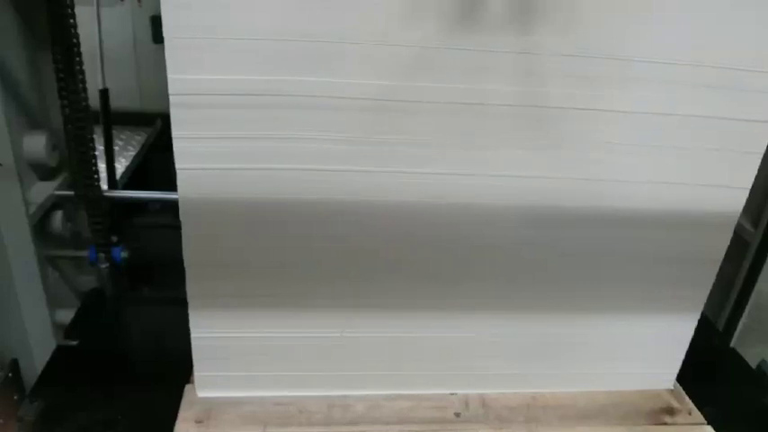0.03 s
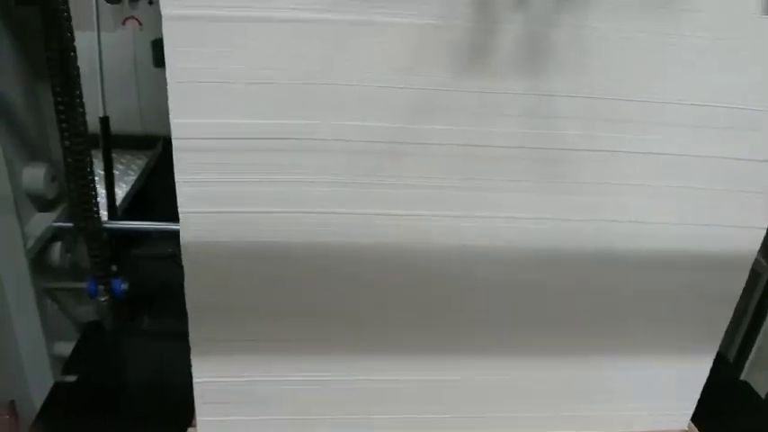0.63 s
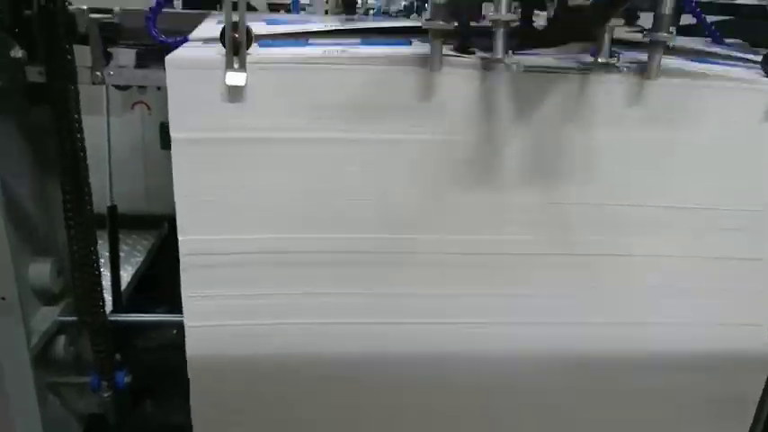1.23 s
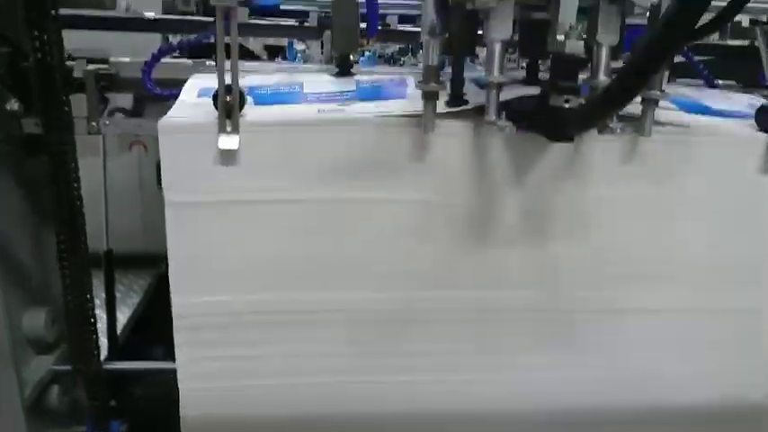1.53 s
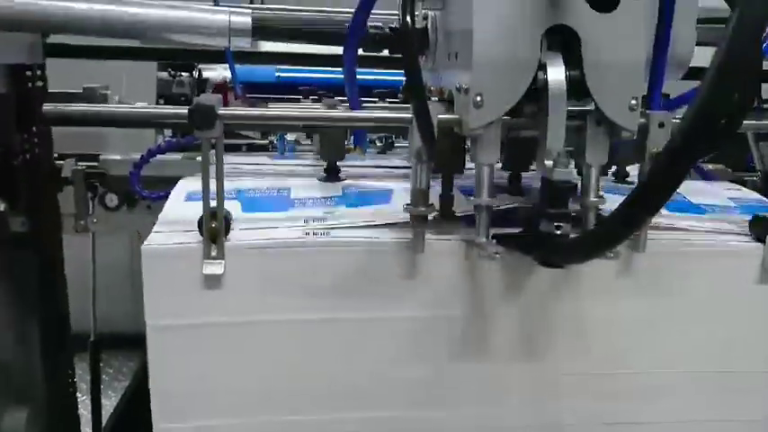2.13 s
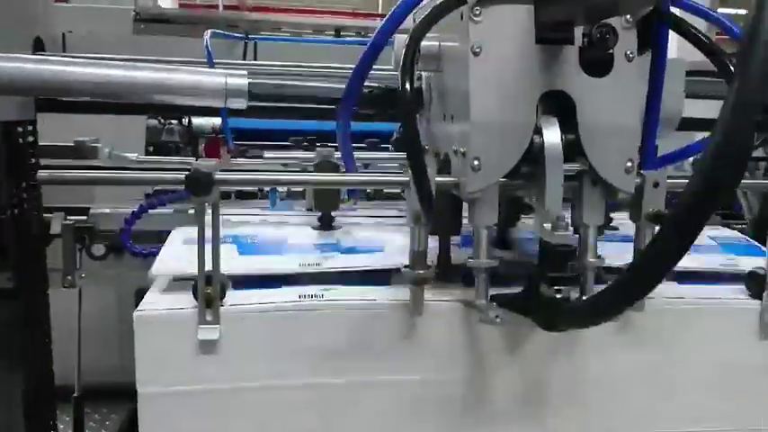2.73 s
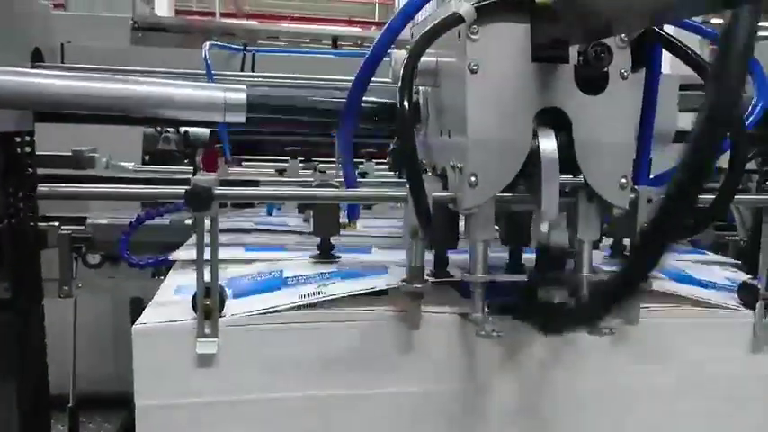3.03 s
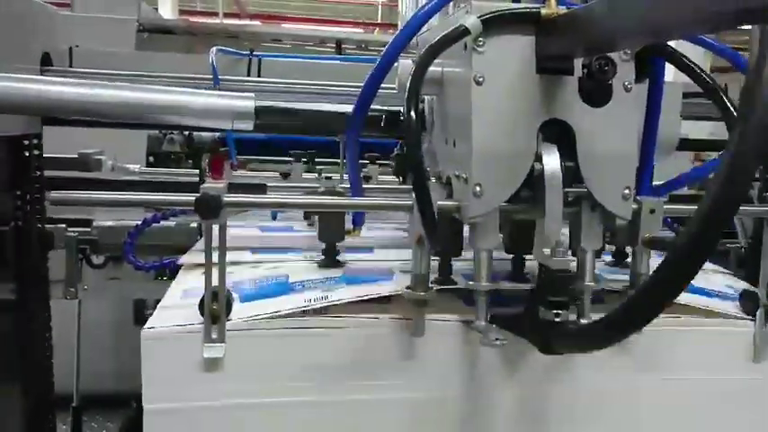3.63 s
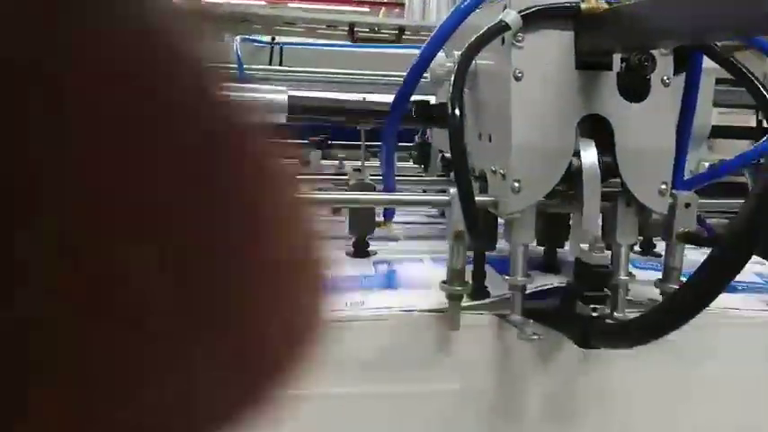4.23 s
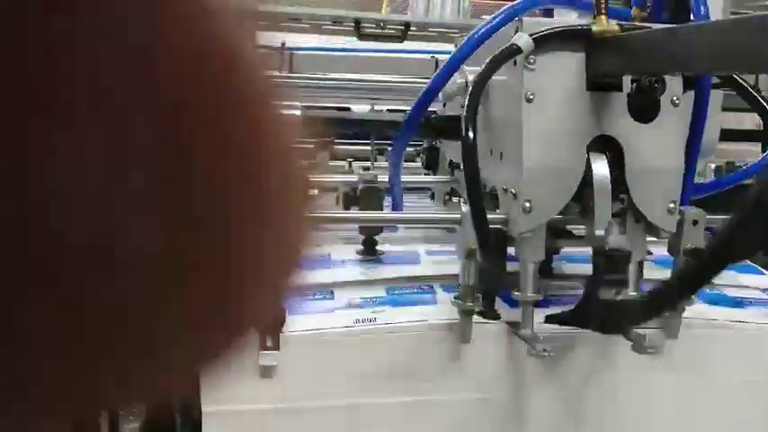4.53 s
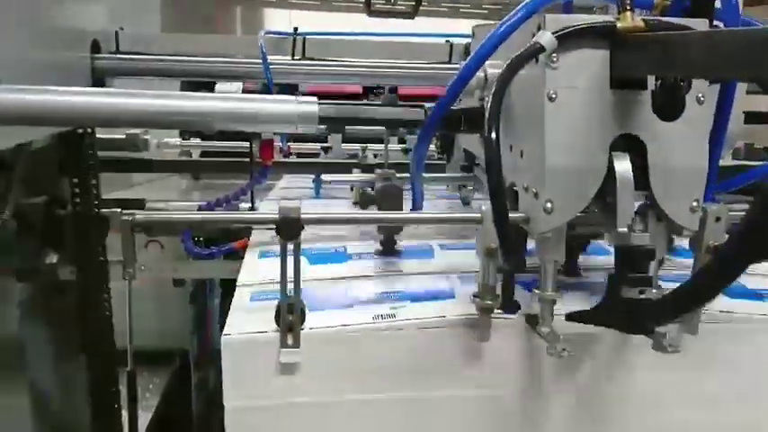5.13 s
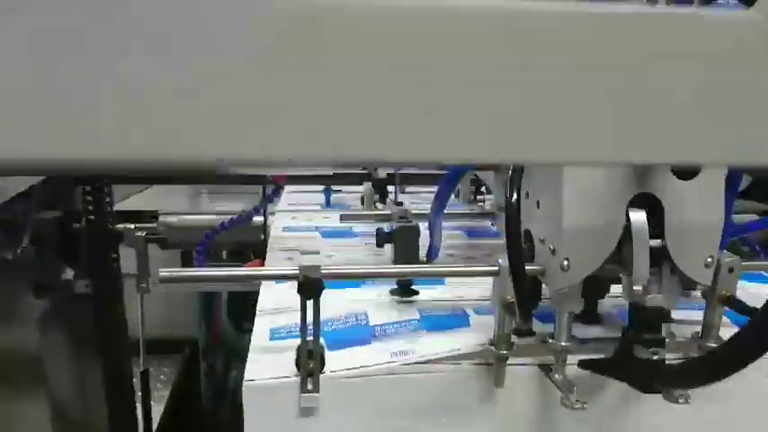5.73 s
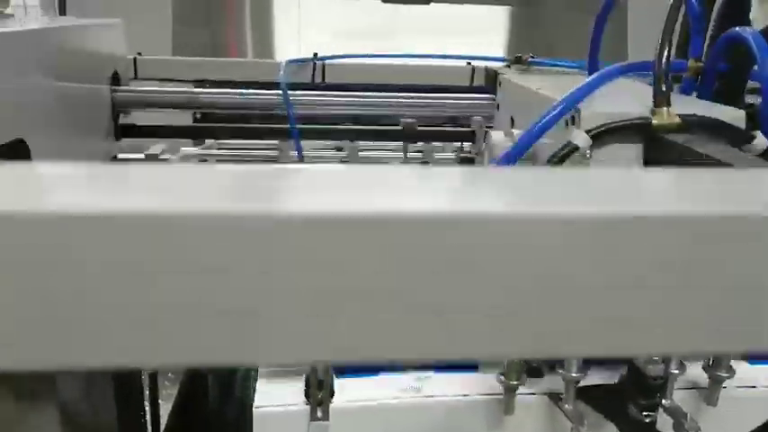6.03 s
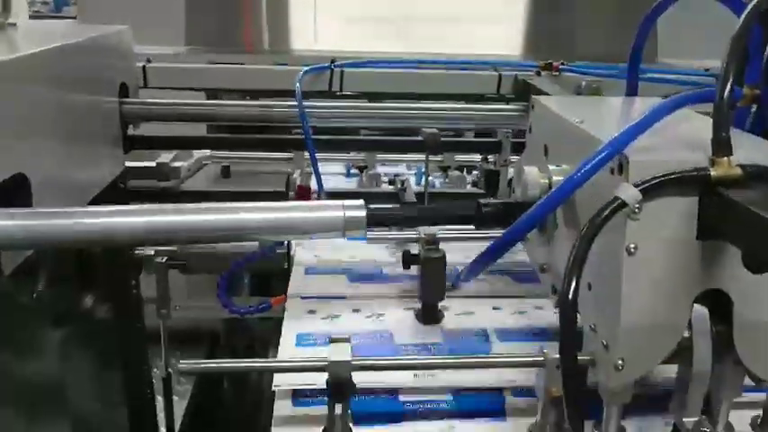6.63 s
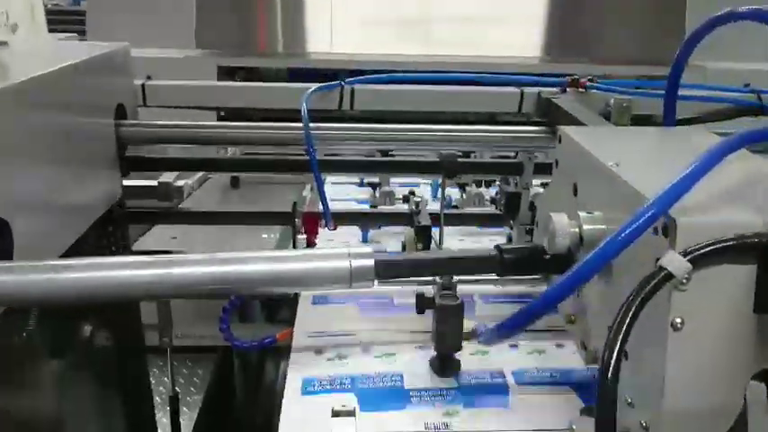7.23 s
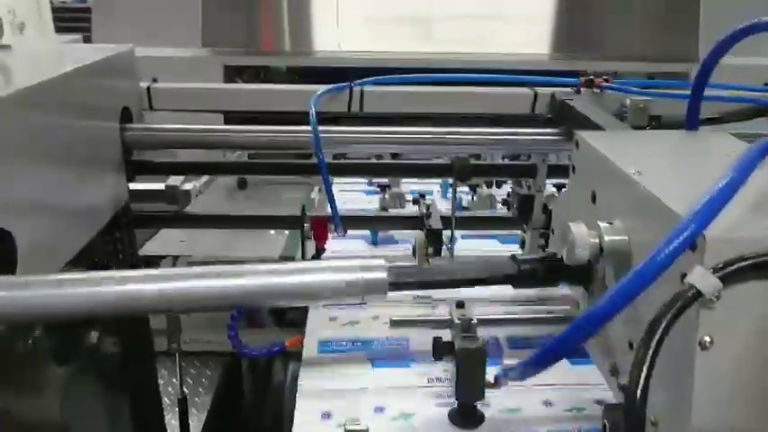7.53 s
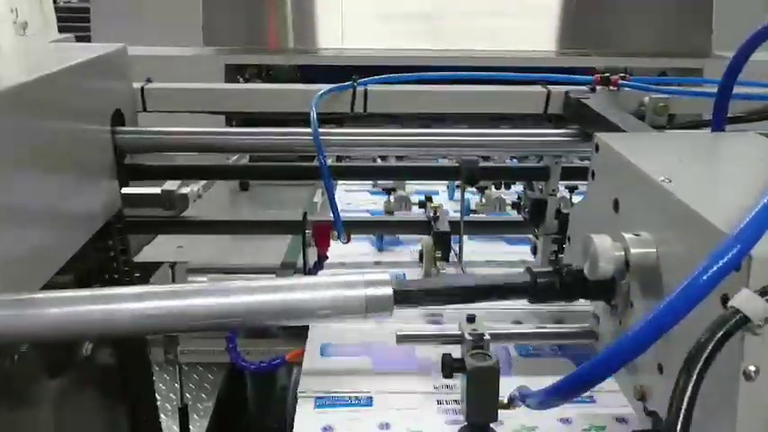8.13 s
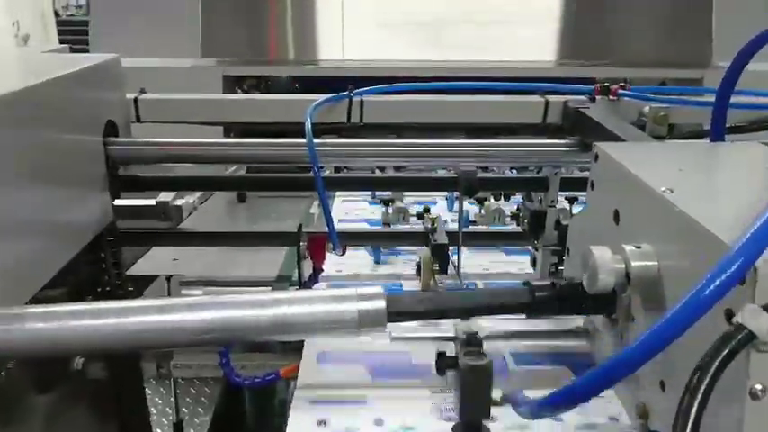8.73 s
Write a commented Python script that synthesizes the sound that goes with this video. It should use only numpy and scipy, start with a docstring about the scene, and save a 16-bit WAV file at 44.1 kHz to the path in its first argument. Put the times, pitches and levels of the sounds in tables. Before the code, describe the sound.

Close, steady clacking of a printing machine feeding sheets, with puffs of air, rustling paper, hum and pump rumble.

```python
"""A factory hall, close to the sheet feeder of a printing press; the sound cuts in after a silent second.
Each turn of the cam shaft brings the hard clack of a lever, light knocks and ticks, thumps of the frame,
a puff of the suckers, and the rustle and flick of a sheet. Gears rattle in step with the shaft over a
pulsing hum, thin whines, blown air and the rumble of pumps. The microphone drifts from the feeder head
towards the press, so the air and paper recede while the knocks and hum come forward."""
import sys
import numpy as np
from scipy import signal
from scipy.fft import rfft, irfft
from scipy.io import wavfile
from scipy.ndimage import uniform_filter1d

SR = 44100
rng = np.random.default_rng(int(sys.argv[2]) if len(sys.argv) > 2 else 0)


def log_audio(samples):
    """Write samples as a 16-bit WAV file to the path given in sys.argv[1]."""
    # one column per channel
    frames = np.atleast_2d(samples).T
    # limit to full scale, then quantise
    limited = np.clip(frames, -1, 1)
    pcm = np.round(limited * 32767).astype(np.int16)
    wavfile.write(sys.argv[1], SR, pcm)


N = 387638
T = np.arange(N) / SR
BINS = np.maximum(np.fft.rfftfreq(N, 1 / SR), 1)
FIRST_CLACK_S, TURN_S = .8043, .5498  # one clack per turn of the cam shaft
CLACKS_S = np.arange(FIRST_CLACK_S, N / SR, TURN_S)

# Tone curves of the noise layers: freq_hz, density_db
GEAR_EQ = [(25, -87), (42, -78), (57, -52), (74, -59), (105, -47.5), (165, -52.5), (240, -47.5), (350, -56),
           (560, -53.5), (1000, -57.5), (1500, -60.5), (3000, -81.5)]  # rattling gears and chains
PUMP_EQ = [(20, -81), (38, -79), (55, -58), (75, -56.5), (115, -52), (170, -53), (280, -49.5), (420, -53),
           (800, -52.5), (1500, -60), (2400, -61.5), (3300, -64), (6000, -76.5), (15000, -99)]  # rumbling pumps
LEAK_EQ = [(900, -74), (1800, -62), (2800, -61), (3400, -69), (4500, -68), (6500, -74.5), (14000, -95)]  # air escaping at the head
BLOWER_EQ = [(2000, -96), (3500, -73.5), (5300, -71), (7300, -66), (10000, -70), (14500, -74)]  # bright hiss of the nozzles
CLATTER_EQ = [(150, -50), (300, -55.5), (480, -41), (760, -42.5), (1030, -40.5), (1400, -43.5),
              (2100, -52.5), (3200, -69), (8000, -90)]  # clatter of the bouncing lever
PUFF_EQ = [(150, -55.5), (500, -50), (1000, -50.5), (1420, -52.5), (1700, -55.5), (2150, -50), (3200, -58),
           (5000, -61.5), (5800, -58.5), (7500, -61), (10000, -65.5), (14500, -74)]  # suckers letting go
CRACKLE_EQ = [(900, -68), (2100, -50.5), (3000, -66), (5500, -66), (7500, -65.5), (10000, -65),
              (14500, -84)]  # crisp crackle of the sheet
SLIDE_EQ = [(250, -58), (500, -50), (1200, -54.5), (2100, -57.5), (3000, -63), (6000, -75)]  # its dull slide over the pile
FLICK_EQ = [(1500, -79), (4000, -67), (7300, -55), (10000, -52.5), (14500, -58.5)]  # crack of its tail
# Thin whines of pumps and belts: pitch_hz, width_hz, level_db
WHINE_BANDS = [(148.8, 2.2, -44), (591, 2.9, -44), (873.5, 11, -40), (1011, 19, -36.5), (1400, 36, -40),
               (2110, 15, -38)]
# Blower valves opening, timed from the clack like every delay below: delay_s, hold_s, level_db
VALVE_BLASTS = [(.028, 0.024, -2.5), (.24, .012, 1.5), (.297, 0.074, 3), (.452, .008, -2.5),
                (.515, 0.042, -2)]
# Ring of the lever and side plate: pitch_hz, level_db, t60_s
PLATE_MODES = [(498, 1, 0.18), (566, 0.5, 0.43), (594, 0.5, 0.29), (657, -3.5, 0.95), (711, -3.5, 0.55),
               (898, 0, 0.55), (929, -1, 0.62), (910, -18, .14), (1027.4, 3.5, 0.33), (1090, -2, 0.32),
               (1140, 3, 0.19), (1130, -9, 0.15), (1283, -4, 0.38), (1324, -7, 0.16), (1474, -9, 0.11),
               (1490, -4, 0.13), (1880, -9, .08), (2118, 2, 0.077)]
# The lever's strike and its rebounds: delay_s, level_db
LEVER_HITS = [(0, -1.5), (.0065, 1), (0.013, 0), (0.0213, -2.5), (.029, -9), (.036, -7.5), (.062, -5),
              (0.071, -10), (.085, -10), (.109, -20), (0.136, -5.5)]
# Lighter levers knocking: delay_s, pitch_hz, level_db, t60_s
LEVER_KNOCKS = [(.134, 2180, -37, .12), (.335, 1419, -19.5, 0.52), (.35, 2080, -44, .15),
                (.356, 1470, -26, 0.079), (.362, 2390, -26, 0.092), (.451, 1910, -28, .1),
                (.471, 2020, -40, .06), (.474, 1475, -24, 0.073), (.53, 2020, -21, 0.07)]
# Small catches and stops ticking: delay_s, pitch_hz, level_db
CATCH_TICKS = [(0.135, 7080, -24.5), (.235, 6800, -34), (.472, 7500, -17), (.481, 7350, -34),
               (.507, 7050, -22), (.528, 7550, -22)]
# Cam strokes shaking the frame: delay_s, pitch_hz, level_db, half_length_s
FRAME_THUMPS = [(0.035, 110, -24, 0.022), (0.028, 254, -19.5, 0.015), (.163, 115.6, -17, 0.022),
                (.165, 58.5, -28.5, 0.023), (.222, 107, -22.5, 0.017), (0.249, 58, -33, 0.026),
                (0.291, 101, -20, 0.013), (0.35, 110.6, -15.5, 0.02), (0.373, 107, -14, 0.018),
                (.356, 184, -19.5, 0.016), (.378, 233, -12, 0.0071), (0.431, 258, -16.5, 0.0055),
                (0.477, 109, -22, 0.019), (0.466, 246, -21, 0.015), (.505, 119, -30.5, 0.0083),
                (0.526, 60, -36, 0.022)]
# The sheet being lifted and snatched forward: delay_s, hold_s, level_db
SHEET_PULLS = [(.352, 0.011, -1), (.39, 0.037, -9), (.447, .012, -3.5), (.473, .016, -0.5)]
# Each sheet's tail flicking free: time_s, level_db, flutter_s
TAIL_FLICKS = [(1.2553, -13, .008), (1.8219, -10, .008), (2.39, -1.5, .018), (2.938, -1.5, .017),
               (3.4865, 1.5, 0.019), (4.041, -3, .014), (4.588, -4, .008), (5.133, -5, 0.01),
               (5.673, -1, .006), (6.214, -6, .004), (6.7586, -12, .006), (7.301, -3, 0.0028),
               (7.8575, -2, .01), (8.414, 2, 0.012)]
# The microphone's path past the feeder head: time_s, nearness_db
HEAD_NEARNESS = [(.9, 3.5), (2.2, 4), (3.5, 3.5), (4.2, 1.5), (5.3, 0), (6.2, -5), (7.4, -4.5), (8.8, -2)]
# How each layer rides that path, negative if it grows away from the head: layer, gain_db_per_db
RIDE = dict(gears=0.29, thumps=0.25, puff=.45, blower=-0.05, sheen=0.27, blow=-0.41, ring=-0.06, knocks=-0.87, hum=-0.43, balance=0.12)
# How alike the two channels are, from 0 to 1: freq_hz, likeness
STEREO_LIKENESS = [(60, 0.96), (180, 0.96), (300, 0.86), (550, 0.82), (1000, 0.25), (2000, 0), (14000, 0)]
# Where the machine sits between the speakers: freq_hz, left_minus_right_db
STEREO_LEAN = [(60, -3.5), (300, -2.2), (1000, -2.8), (1400, -4), (2100, -2), (2900, 2.1), (5500, 2.8),
               (7300, -2.5), (10000, 1), (14000, 1.5)]
# The microphone ports lose the deepest bass and swallow a band of treble: freq_hz, gain_db
PORT_EQ = [(20, -23), (48, 0), (7400, 0), (8100, -4.5), (8900, -16), (9600, -21), (10700, -10),
           (12200, -13), (14000, -7.5)]


def undb(db):
    """Decibels to gain."""
    return 10 ** (np.asarray(db) / 20)


def at_bins(points):
    """A curve over frequency, read on a log axis at every FFT bin."""
    hz, value = np.transpose(points)
    return np.interp(np.log(BINS), np.log(hz), value)


def colour(x, eq):
    """Give unit white noise a tone curve in dB per Hz."""
    return irfft(rfft(x) * undb(at_bins(eq)) * np.sqrt(SR / 2), N)


def pan(left_minus_right_db):
    """Left and right gains for a level difference."""
    return undb(np.array([[1], [-1]]) * left_minus_right_db / 2)


def drift(rate_hz):
    """Smooth random movement with a spread near 1."""
    hold = max(int(SR / rate_hz), 1)
    steps = np.repeat(rng.standard_normal(N // hold + 1), hold)
    return 1.08 * uniform_filter1d(uniform_filter1d(steps, hold), hold)[:N]


def white():
    """Two channels of fresh noise."""
    return rng.standard_normal((2, N))


def looped_noise(count):
    """Noise that comes back on every turn, slowly crossfading through a few loops."""
    size = int(round(TURN_S * SR))
    phases = 2 * np.pi * rng.random((count, 2, size // 2 + 1))
    loops = irfft(np.exp(1j * phases), size) * np.sqrt(size)
    place = np.linspace(0, count - 1, N)
    return sum(loop[:, np.arange(N) % size] * np.cos(np.pi / 2 * np.minimum(abs(place - k), 1))
               for k, loop in enumerate(loops))


def narrow_tone(hz, width_hz):
    """An unsteady tone of rms near 1: noise in one resonance."""
    band = 1 / (1 + (2 * (BINS - hz) / width_hz) ** 2)
    return irfft(rfft(white()) * band / np.sqrt(np.mean(band ** 2)), N)


def bell(t, at_s, half_length_s):
    """A smooth rise to 1 and fall back."""
    return np.exp(-((t - at_s) / half_length_s) ** 2)


def treble_ride(x, above_hz, db, at_s, half_length_s):
    """The treble swells or sinks for a moment."""
    top = irfft(rfft(x) / (1 + (above_hz / BINS) ** 4), N)
    return x + top * (undb(db * bell(T, at_s, half_length_s)) - 1)


def near(share, time_s=T):
    """Fader for a layer that follows the nearness to the feeder head by this share."""
    return undb(share * np.interp(time_s, *np.transpose(HEAD_NEARNESS)))


def since_clack():
    """Seconds since the clack's point in the turn."""
    return (T - FIRST_CLACK_S) % TURN_S


def cam(opens_s, hold_s, attack_s, release_s):
    """Envelope of something that the cam opens, holds and lets go on every turn."""
    lead_s = TURN_S / 4  # room for the attack
    age = (since_clack() - opens_s + lead_s) % TURN_S - lead_s
    return np.exp(np.minimum(age, 0) / attack_s - np.maximum(age - hold_s, 0) / release_s)


def strokes(rows, attack_s, release_s, rest_db):
    """Joint envelope of several cam strokes over a resting level."""
    power = sum((undb(db) * cam(delay, hold, attack_s, release_s)) ** 2 for delay, hold, db in rows)
    return np.sqrt(undb(rest_db) ** 2 + power)


def gears_and_pumps(rattle_db=2.0, churn_db=1.5):
    """The bed: gears and chains repeat with the shaft; pumps churn on their own."""
    gears = looped_noise(count=3) * near(RIDE["gears"]) * undb(rattle_db * drift(130) - 0.73)
    pumps = white() * undb(churn_db * drift(25))
    return colour(gears, GEAR_EQ) + colour(pumps, PUMP_EQ)


def hum(hz=296.7, sag_hz=19, idle_db=-33.5, swell_db=-33, wander_db=1.0, waver_rad=0.4):
    """The drive hums: it swells in the middle of each turn and sags in pitch as the sheet is snatched."""
    pitch = hz - sag_hz * bell(since_clack(), at_s=.455, half_length_s=.037)
    swell = undb(swell_db) * cam(opens_s=0.19, hold_s=0.11, attack_s=0.025, release_s=0.068)
    level = (undb(idle_db) + swell) * near(RIDE["hum"]) * undb(wander_db * drift(5))
    phase = 2 * np.pi * np.cumsum(pitch) / SR + waver_rad * drift(5.5)
    return np.sqrt(2) * level * np.sin(phase)


def whines():
    """Pumps and belts sing in narrow, unsteady tones."""
    return sum(narrow_tone(hz, width) * undb(db) for hz, width, db in WHINE_BANDS)


def leak(whistle_hz=2850, whistle_db=-39.0, swell_db=8.5, waver_db=2):
    """Air escapes steadily at the feeder head, with a thin wavering whistle that swells once."""
    lift_db = swell_db * bell(T, at_s=3.55, half_length_s=0.2) + waver_db * drift(6.9)
    hiss = colour(white() * near(0.98), LEAK_EQ)
    return hiss + narrow_tone(whistle_hz, width_hz=70) * undb(whistle_db + lift_db)


def blower(flutter_db=1.5):
    """Nozzles fan the pile with a hiss that surges in time with the cam."""
    valves = strokes(VALVE_BLASTS, attack_s=0.018, release_s=0.027, rest_db=-3.5) * near(RIDE["blower"])
    return colour(white() * valves * undb(flutter_db * drift(60)), BLOWER_EQ)


def plate_ring(t, trim_db=-22, bloom_s=0.0051):
    """The struck lever and side plate take a moment to bloom, then ring out."""
    ring = np.zeros((2, len(t)))
    for k, (hz, db, t60) in enumerate(PLATE_MODES):
        phase = 2 * np.pi * hz * t
        # neighbouring modes swing in opposite senses; mid and side are a quarter cycle apart
        swing = (-1) ** k * np.array([np.sin(phase), rng.choice([-1, 1]) * np.cos(phase)])
        ring += swing * undb(db + trim_db) * np.exp(-np.log(1000) * t / t60)
    return ring * (1 - np.exp(-t / bloom_s))


def clatter(burst_s=0.0063, hall_s=0.13, hall_db=-10):
    """Each hit of the lever throws a burst of noise, and the hall adds a tail."""
    age = since_clack()
    burst_power = sum((age >= delay) * (undb(db) * np.exp(-abs(age - delay) / burst_s)) ** 2
                      for delay, db in LEVER_HITS)
    tail = undb(hall_db) * np.exp(-age / hall_s)
    bursts = colour(looped_noise(count=4) * np.sqrt(burst_power + tail ** 2), CLATTER_EQ)
    # brightest while the microphone faces the lever
    return treble_ride(bursts, above_hz=1400, db=4.0, at_s=4.94, half_length_s=0.79)


def clack(note_hz=1040, note_db=-4.5, attack_s=0.00053, decay_s=0.0049, rebound_db=-5, clatter_db=-1):
    """A lever hits its stop and rebounds: a short hard note and a clatter each time, over the ring."""
    t = np.arange(int(.45 * SR)) / SR
    ring = plate_ring(t)
    envelope = np.exp(-t / decay_s) * (1 - np.exp(-t / attack_s))
    note = undb(note_db) * np.sin(2 * np.pi * note_hz * t) * envelope
    mid_side = np.zeros((2, N))
    for start in CLACKS_S:
        add(mid_side, start, ring * near(RIDE["ring"], start))
        add(mid_side[0], start, note * near(RIDE["blow"], start))
        for k, (delay, db) in enumerate(LEVER_HITS[1:]):
            # the rebounds sound centred and wide by turns as the lever settles
            add(mid_side[k % 2], start + delay, note * undb(db + rebound_db))
    return mid_side + clatter() * undb(clatter_db)


def knocks(scatter_db=4.5, detune_hz=25, trim_db=-.5):
    """Lighter levers knock on every turn and ring with two close modes each."""
    t = np.arange(int(.2 * SR)) / SR
    out = np.zeros((2, N))
    for start in CLACKS_S:
        for delay, hz, db, t60 in LEVER_KNOCKS:
            modes_hz = hz + detune_hz * rng.standard_normal((2, 2, 1))
            ring = np.sin(2 * np.pi * modes_hz * t).mean(0) * np.exp(-np.log(1000) * t / t60)
            add(out, start + delay, ring * undb(db + trim_db + scatter_db * rng.standard_normal()))
    return out * near(RIDE["knocks"])


def tick(hz, detune_hz=350, ring_s=0.0081, snap_s=.002, snap_db=-16):
    """One steel catch lands: a dry snap and a short bright ring."""
    t = np.arange(int(.04 * SR)) / SR
    modes_hz = hz + detune_hz * rng.standard_normal((3, 2, 1))
    ring = np.sin(2 * np.pi * modes_hz * t).mean(0) * np.exp(-t / ring_s)
    snap = np.diff(rng.standard_normal((2, len(t) + 1))) / 2
    return ring + snap * np.exp(-t / snap_s) * undb(snap_db)


def catches(scatter_db=2.0, jitter_s=0.0012):
    """Small catches tick on the right on every turn, some harder than others."""
    out = np.zeros((2, N))
    for start in CLACKS_S:
        for delay, hz, db in CATCH_TICKS:
            late, force = rng.standard_normal(2)
            add(out, start + delay + jitter_s * late, tick(hz) * undb(db + scatter_db * force))
    return out * pan(-5.0)


def thumps(scatter_db=0.7, trim_db=.5):
    """Each cam stroke is a smooth push that swings the frame for a few cycles."""
    t = np.arange(-SR // 10, SR // 10) / SR
    out = np.zeros(N)
    for delay, hz, db, half_length in FRAME_THUMPS:
        swing = np.cos(2 * np.pi * hz * t) * bell(t, 0, half_length)
        for start, force in zip(CLACKS_S, rng.standard_normal(len(CLACKS_S))):
            add(out, start + delay + t[0], swing * undb(trim_db + db + scatter_db * force))
    return out * near(RIDE["thumps"])


def suckers(flutter_db=1.5):
    """The suckers let go with a puff of air and a weaker after-puff."""
    puff = undb(-2) * cam(opens_s=0.337, hold_s=0.042, attack_s=0.0036, release_s=0.062)
    after_puff = undb(-22) * cam(opens_s=0.48, hold_s=0.022, attack_s=.01, release_s=0.017)
    envelope = (puff + after_puff) * near(RIDE["puff"])
    return colour(white() * envelope * undb(flutter_db * drift(120)), PUFF_EQ)


def paper(crackle_db=4.0, flap_db=2.5):
    """The sheet slides off the pile and crackles in short bursts as it is snatched forward."""
    grains = undb(crackle_db * np.tanh(drift(700) / 2) * 2 + flap_db * drift(140))
    grains /= np.sqrt(np.mean(grains ** 2))
    pull = strokes(SHEET_PULLS, attack_s=0.0083, release_s=0.014, rest_db=-44)
    return colour(white() * grains * pull, CRACKLE_EQ) + colour(white() * pull, SLIDE_EQ)


def flicks(crack_s=0.0023, flutter_db=-6, crackle_db=3):
    """The tail of each sheet flutters up to one sharp crack and dies away."""
    t = np.arange(-SR // 10, SR // 10) / SR
    power = np.zeros(N)
    for time_s, db, flutter_s in TAIL_FLICKS:
        crack = np.exp(-2 * abs(t) / crack_s)
        flutter = undb(flutter_db) ** 2 * np.exp(-2 * abs(t) / flutter_s)
        add(power, time_s + t[0], undb(db) ** 2 * (crack + flutter))
    return colour(white() * np.sqrt(power) * undb(crackle_db * drift(600)), FLICK_EQ) * pan(-4)


def add(out, start_s, sound):
    """Drop a sound onto a track."""
    i = int(start_s * SR)
    if 0 <= i < N:
        out[..., i:i + sound.shape[-1]] += sound[..., :N - i]


def beamed(x, above_hz=9000, trim_db=-1):
    """The top of a hiss travels in a narrow beam, so it fades as the microphone leaves the head."""
    top = signal.sosfiltfilt(signal.butter(2, above_hz, "high", fs=SR, output="sos"), x)
    return x + top * (undb(trim_db) * near(RIDE["sheen"]) - 1)


def diffuse(mid_side):
    """Mid and side become a diffuse left and right: alike in the bass, wide in the treble."""
    mid, side = rfft(mid_side)
    alike = np.clip(at_bins(STEREO_LIKENESS), 0, 1)
    mid, side = mid * np.sqrt((1 + alike) / 2), side * np.sqrt((1 - alike) / 2)
    return irfft([mid + side, mid - side], N)


def scene():
    """The whole feeder, its heavy parts a little to the right, and more so as the microphone moves on."""
    machinery = gears_and_pumps() + clack() + knocks()
    air_and_paper = beamed(blower() + suckers() + paper()) + leak()
    field = diffuse(machinery + air_and_paper + whines()) + thumps() + hum()
    lean = undb(np.outer([1, -1], at_bins(STEREO_LEAN)) / 2)
    lean /= np.sqrt(np.mean(lean ** 2, axis=0))  # constant power
    left_gain = near(RIDE["balance"] / 2)
    placed = irfft(rfft(field) * lean, N) * np.array([left_gain, 1 / left_gain])
    return placed + catches() + flicks()


def record(dry, start_s=.915, opening_db=4, settle_s=0.03, ceiling=.97, top_hz=14300):
    """The microphone's colour, a sudden and slightly loud start, rounded peaks and a steep top cut."""
    # a finger passes over the microphone and shades the treble
    shaded = treble_ride(dry, above_hz=3800, db=-3, at_s=4.36, half_length_s=0.27)
    opening = (T >= start_s) * undb(opening_db * np.exp(-abs(T - start_s) / settle_s))
    heard = irfft(rfft(shaded) * undb(at_bins(PORT_EQ)), N) * opening
    rounded = heard / (1 + (heard / ceiling) ** 6) ** (1 / 6)
    return signal.sosfilt(signal.ellip(12, .2, 80, top_hz, fs=SR, output="sos"), rounded)


dry = scene()
out = record(dry)
log_audio(out)
```